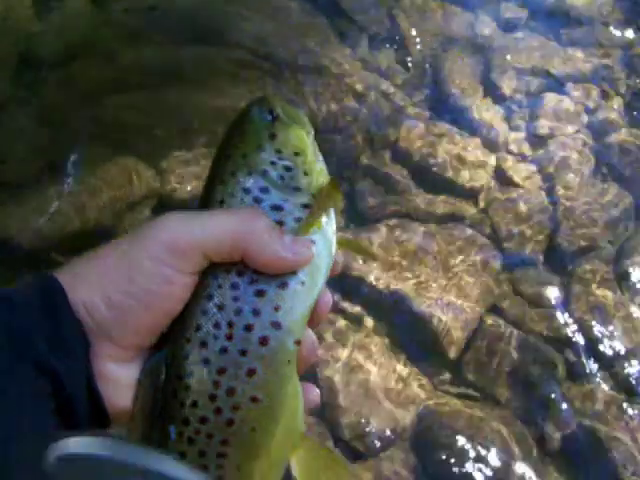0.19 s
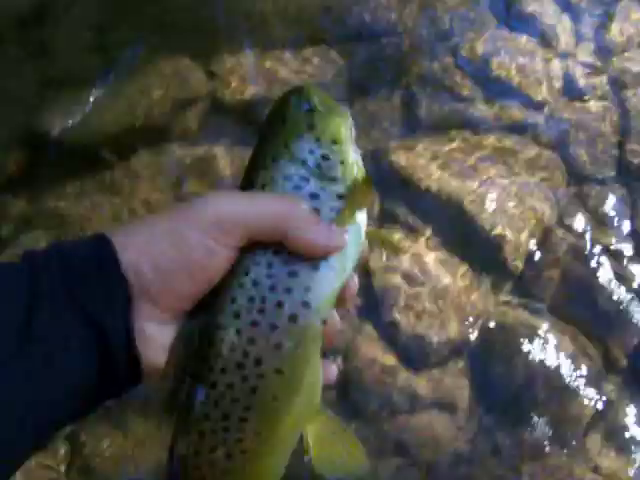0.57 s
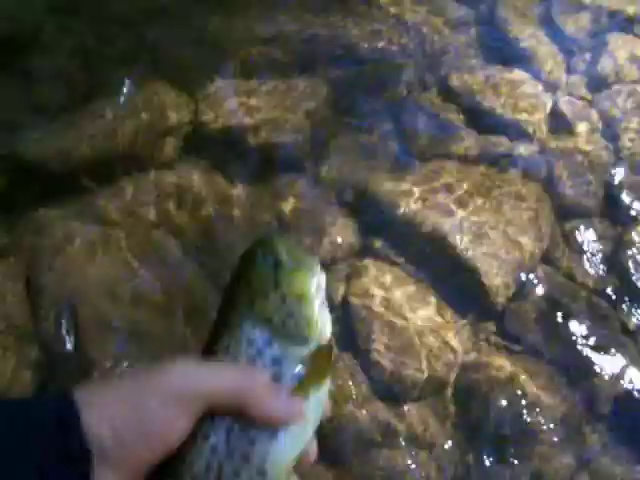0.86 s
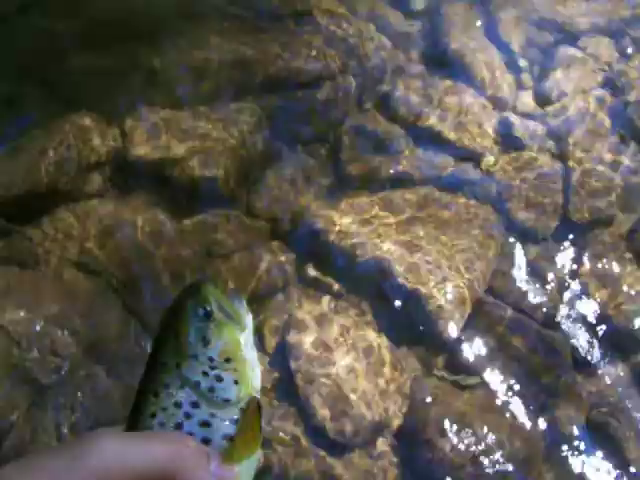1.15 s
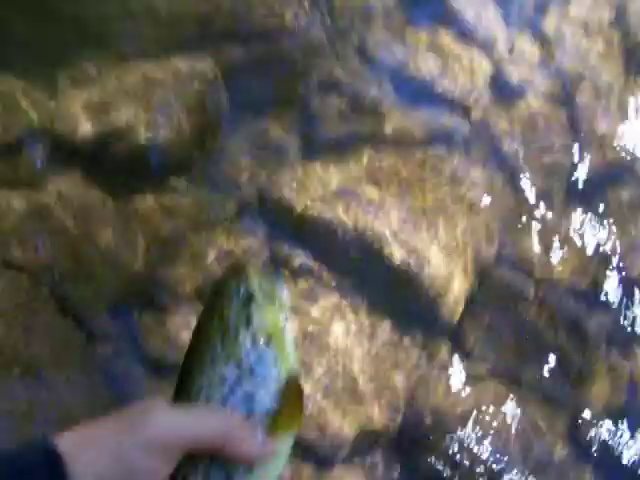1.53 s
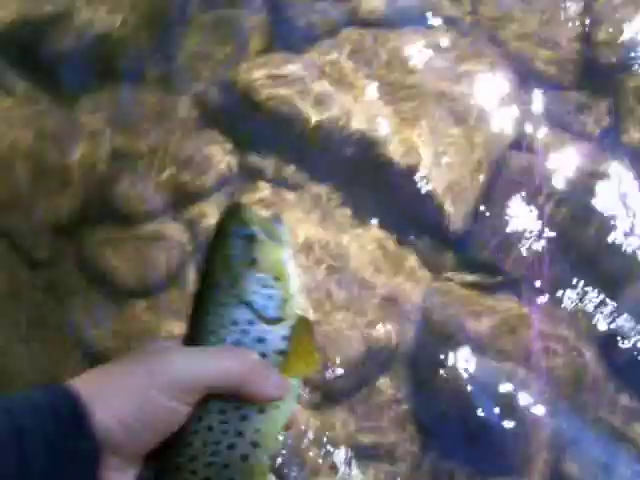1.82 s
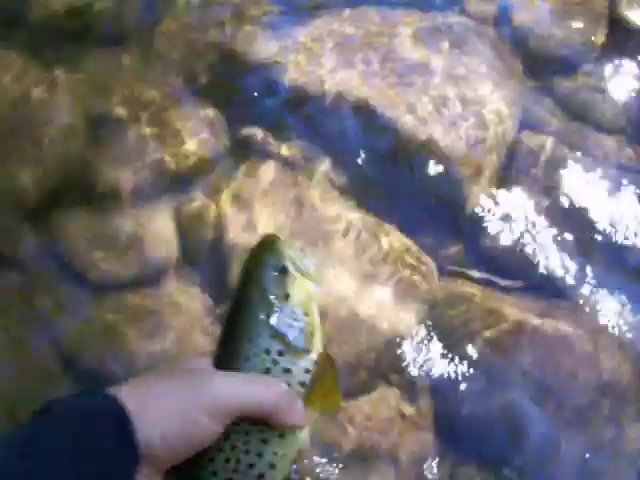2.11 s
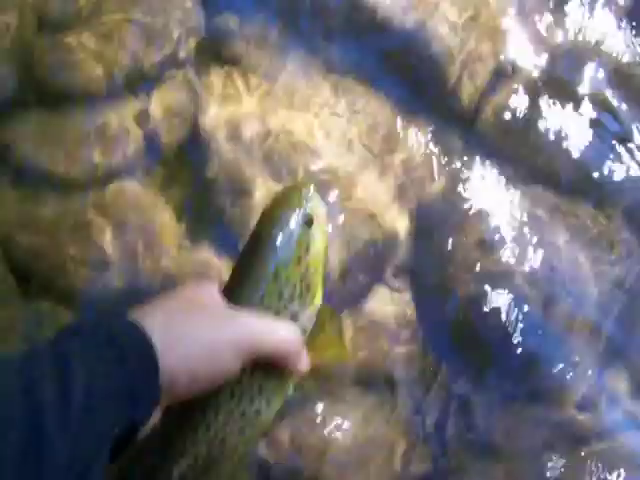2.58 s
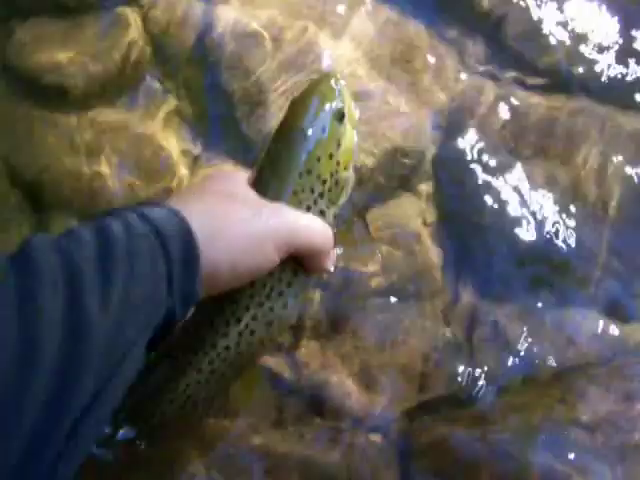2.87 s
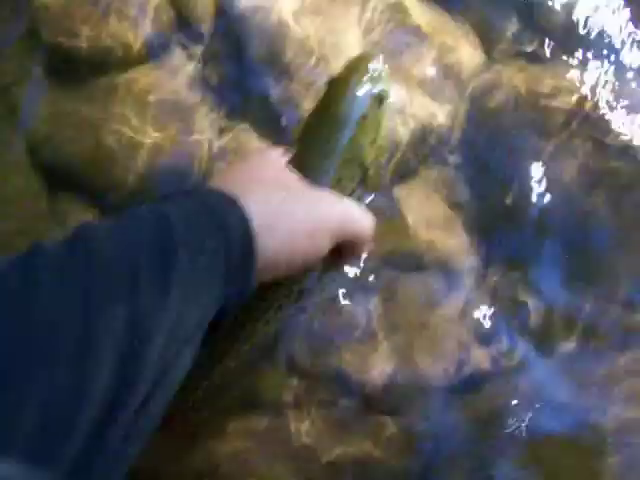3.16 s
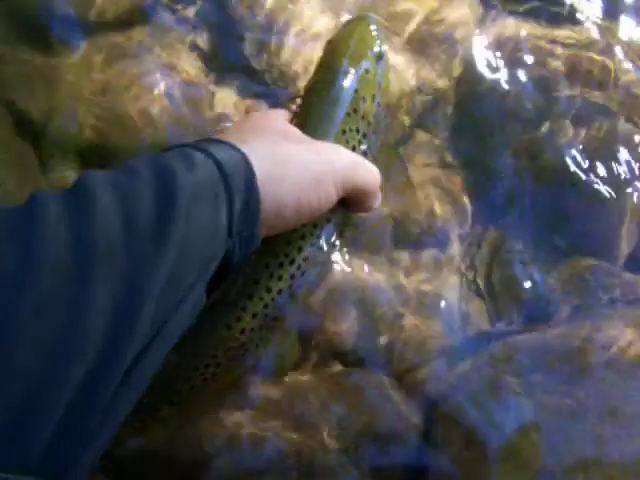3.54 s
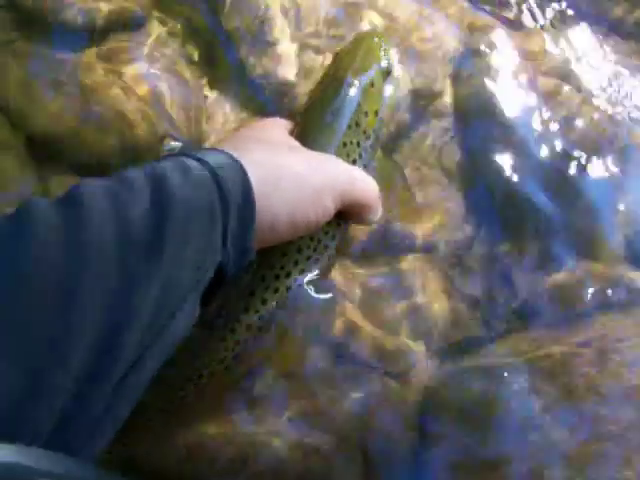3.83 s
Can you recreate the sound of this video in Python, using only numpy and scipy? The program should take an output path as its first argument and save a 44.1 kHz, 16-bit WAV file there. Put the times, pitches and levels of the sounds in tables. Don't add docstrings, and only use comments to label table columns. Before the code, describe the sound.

A shallow stream rushes over stones, with droplet ticks, low gurgles and one sharp loud drop.

```python
import sys
import numpy as np
from scipy import signal
from scipy.fft import rfft, irfft, next_fast_len
from scipy.io import wavfile
from scipy.ndimage import uniform_filter1d, map_coordinates

SR = 44100
rng = np.random.default_rng(int(sys.argv[2]) if len(sys.argv) > 2 else 0)


def to_wav(sig):
    pcm = np.clip(np.atleast_2d(sig), -1, 1) * 32767
    pcm = np.round(pcm).astype(np.int16)
    wavfile.write(sys.argv[1], SR, pcm.T)


def elevation(decibels):
    levels = np.asarray(decibels, float)
    return 10 ** (levels / 20)


N = 176400


def unit(x):
    return x / np.sqrt(np.mean(x ** 2) + 1e-20)


def curve(rows):
    seconds, values = np.transpose(rows)
    return np.interp(np.arange(N) / SR, seconds, values)


def wobble(rate):
    knots = rng.standard_normal(400)
    return map_coordinates(knots, [np.arange(N) * min(rate, 90) / SR])


def coloured(x, *spectra):
    size = next_fast_len(N + 8192)
    log_hz = np.log(np.fft.rfftfreq(size, 1 / SR) + 1)
    db = 0
    for points in spectra:
        hz, level = np.transpose(points)
        db = db + np.interp(log_hz, np.log(hz), level)
    return irfft(rfft(x, size) * elevation(db), size)[:N]


def grains(start_s, hz, gain, cycles, rise, size):
    u = np.arange(size) / SR * hz[:, None]
    tone = np.sin(2 * np.pi * u * (1 + rise * u / cycles / 2))
    decay = np.exp(-u / cycles)
    attack = 1 - np.exp(-u / (0.092 * cycles))
    fade_out = np.cos(np.arange(size) / size * np.pi / 2)
    wave = gain[:, None] * tone * decay * attack * fade_out
    at = (start_s * SR).astype(int)[:, None] + np.arange(size)
    return np.bincount(at.ravel(), wave.ravel(), N + 2 * size)[:N]


def swarm(count, centre_hz, spread, spiky_db, cycles, rise, size):
    chance = rng.random((count, 2))
    hz = np.clip(centre_hz * np.exp(spread * rng.standard_normal(count)), 100, 9000)
    level_db = np.minimum(-spiky_db * np.log(1 - chance[:, 1]), 3 * spiky_db)
    return unit(grains(chance[:, 0] * N / SR, hz, elevation(level_db), cycles, rise, size))


def patchy(depth_db):
    z = signal.stft(rng.standard_normal(N), nperseg=256)[2]
    field = uniform_filter1d(rng.standard_normal(z.shape), size=4, axis=0)
    field = uniform_filter1d(field, size=12, axis=1)
    return unit(signal.istft(z * elevation(depth_db * unit(field)), nperseg=256)[1][:N])


# time in seconds, level in dB.
FADE = [(0.38, -50), (0.55, -39.5), (0.85, -22), (2.06, -22), (2.08, -23.5), (2.09, -23.5), (2.18, -22),
        (4.0, -21.5)]
# time in seconds, pose (0 high, 1 middle, 2 low).
POSE = [(0.4, 0.04), (1.8, 0.2), (2.2, 0.9), (3.0, 1.3), (3.4, 1.6), (4, 1.8)]
# frequency in Hz, density in dB per Hz.
HIGH = [(60, -25), (130, -10.5), (420, 0), (600, -5.5), (1000, -3.5), (1300, -2.5), (2460, -5.5),
        (4500, -5)]
MIDDLE = [(60, -25.5), (130, -12.5), (450, -0.5), (950, -5.5), (1300, 1.5), (1550, -4), (2460, -6.5),
          (4500, -7.5)]
LOW = [(60, -25), (130, -14), (450, 0), (700, -1), (1100, -9.5), (1800, -0.5), (2600, -8), (4500, -9)]
# frequency in Hz, gain in dB.
PORT = [(20, -3), (105, -4), (125, -0.87), (2500, -0.5), (3850, 4.5), (4700, -0.6), (5500, -7),
        (7200, -13.5)]


def rush():
    flutter_db = .2 * wobble(3.5) + .35 * wobble(14) + .7 * wobble(60)
    water = patchy(depth_db=1.2) * elevation(flutter_db)
    fizz = swarm(count=5000, centre_hz=7000, spread=.5, spiky_db=3, cycles=1.5, rise=.1, size=96)
    water = water + elevation(-10.5) * fizz
    bubbles = swarm(count=1500, centre_hz=1516, spread=0.497, spiky_db=1.5, cycles=5, rise=.25, size=600)
    water = water + elevation(-16) * bubbles
    deep = swarm(count=400, centre_hz=380, spread=0.548, spiky_db=-0.5, cycles=6.5, rise=.25, size=3000)
    water = water + elevation(-25) * deep
    pose = np.clip(curve(POSE), 0, 2)
    mix = np.zeros(N)
    for k, view in enumerate([HIGH, MIDDLE, LOW]):
        nearness = np.clip(1 - abs(pose - k), 0, 1)
        mix = mix + nearness * coloured(water, view, PORT)
    return unit(mix) * elevation(curve(FADE))


def ring_bubbles(table, trim_db, cycles):
    start_s, peak_db, hz = np.transpose(table)
    return grains(start_s, hz, elevation(peak_db + trim_db), cycles, rise=.05, size=6000)


# start in seconds, peak level in dB, pitch in Hz.
TICKS = [(0.4953, -32, 3850), (0.8644, -10, 3780), (1.1074, -10, 2690), (1.1814, -12, 3430),
         (1.2516, -11, 3990), (1.2674, -16, 3840), (1.4444, -13, 3790), (1.5254, -10, 3510),
         (1.5404, -12, 3790), (1.6474, -12, 3670), (1.7714, -11, 3960), (1.7833, -8, 3840),
         (1.8058, -11, 3620), (1.8244, -11, 3830), (2.2533, -9, 4120), (2.5504, -15, 3620),
         (3.0184, -12, 3220), (3.1867, -12, 3630), (3.6454, -16, 2010), (3.7954, -15, 4250)]


def ticks():
    return ring_bubbles(TICKS, trim_db=-1.5, cycles=7)


# start in seconds, peak level in dB, pitch in Hz.
GURGLES = [(0.55, -29, 320), (0.779, -20, 353), (0.839, -14.5, 427), (0.969, -20.5, 374), (1.549, -17, 443),
           (1.999, -18, 604), (2.159, -20, 1280), (2.239, -15, 1230), (2.439, -24, 1420),
           (2.579, -13, 1230), (2.869, -14, 671), (3.329, -26, 440), (3.519, -15.5, 694),
           (3.639, -17.5, 520), (3.719, -30, 563), (3.799, -18.5, 382)]


def gurgles():
    return ring_bubbles(GURGLES, trim_db=-4, cycles=7)


# start in seconds, peak level in dB, pitch
# in Hz.
SURGES = [(.55, -30, 418), (.97, -37, 133), (1.52, -34, 143), (2.40, -33, 141), (2.77, -23.5, 307),
          (2.86, -21.5, 570), (3.29, -32, 152), (3.31, -32, 122), (3.45, -37, 132.5), (3.67, -35, 128),
          (3.72, -24.5, 193), (3.79, -32, 178)]


def surges():
    return ring_bubbles(SURGES, trim_db=-2.1, cycles=6)


# start in seconds, peak level in dB, pitch in Hz.
BABBLE = [(0.962, -20.5, 408), (1.043, -34, 393), (1.23, -28, 402), (1.362, -22, 380), (1.418, -25, 416),
          (1.484, -22, 385), (1.55, -26, 447), (1.634, -22, 396)]


def babble():
    return ring_bubbles(BABBLE, trim_db=-3.5, cycles=10)


# frequency in Hz, level in dB, 60 dB decay in seconds.
DROP = [
    (3700, 0.1, .006),
    (2900, -11, .009),
    (2100, -12, .016),
    (5900, -16, .003),
]


def big_drop():
    start_s, level_db, attack_s = 2.0758, 3.2, 0.00022
    t = np.arange(2000) / SR
    ring = sum(elevation(db - 60 * t / t60) * np.sin(2 * np.pi * hz * t) for hz, db, t60 in DROP)
    out = np.zeros(N)
    out[round(start_s * SR):][:len(t)] = elevation(level_db) * ring * (1 - np.exp(-t / attack_s))
    return out


# start in seconds, peak level in dB, pitch in Hz.
RIPPLE = [(2.12, -30, 1170), (2.1645, -20, 1390), (2.2335, -18, 1203), (2.348, -31, 1200),
          (2.424, -30, 1300), (2.504, -22, 1450), (2.5516, -17.5, 1268), (2.806, -21, 1195),
          (2.871, -21, 1330), (2.997, -21.5, 1316)]


def ripples():
    return ring_bubbles(RIPPLE, trim_db=-3, cycles=18)


# start in seconds, peak level in dB, pitch in Hz.
SPRAY = [(3.0134, -19, 6600), (3.0727, -15, 5670), (3.0735, -21, 4500), (3.088, -15, 5750),
         (3.088, -19, 4500), (3.1148, -22, 5720)]


def spray():
    return ring_bubbles(SPRAY, trim_db=-1.5, cycles=8)


def scene():
    bubbles = ticks() + gurgles() + surges() + babble() + ripples() + spray()
    return (rush() + bubbles + big_drop())[None]


def low_pass(x):
    return signal.sosfilt(signal.butter(12, 16500, fs=SR, output="sos"), x)


# frequency in Hz, gain in dB.
BAND = [(7200, 0), (8000, -11), (8600, -20.5), (9150, -42.5), (9400, -80.5)]


def record(dry):
    start_s, clip_top = .3725, .71
    opened = dry[0] * (np.arange(N) > start_s * SR)
    x = np.clip(coloured(opened, BAND), -clip_top, clip_top)
    return low_pass(x[None])


dry = scene()
out = record(dry)
to_wav(out)
```